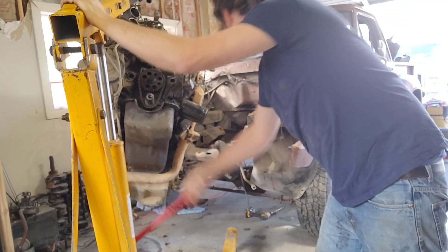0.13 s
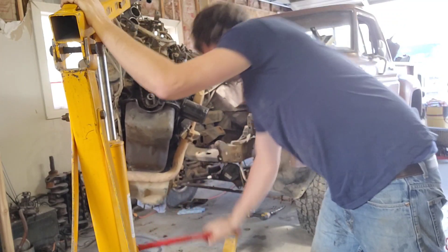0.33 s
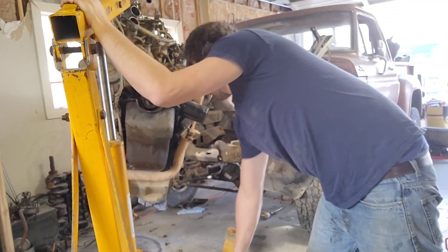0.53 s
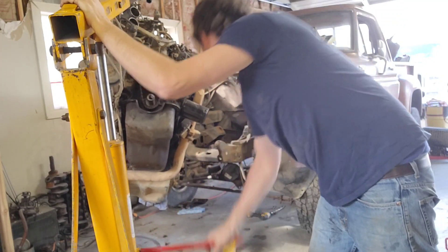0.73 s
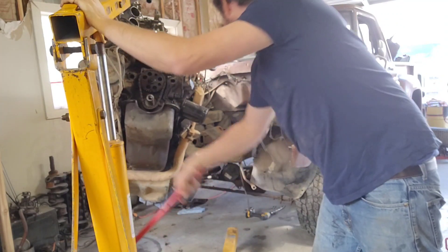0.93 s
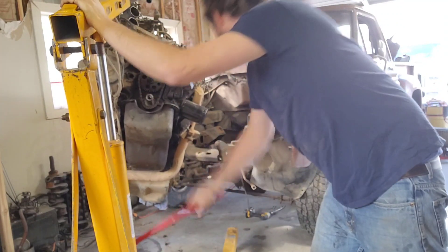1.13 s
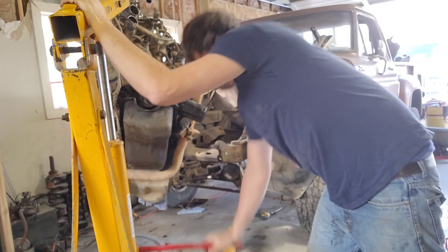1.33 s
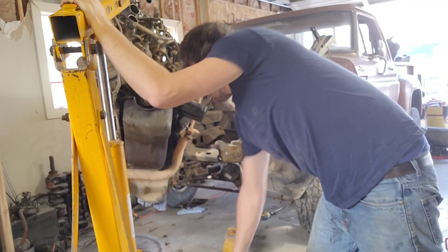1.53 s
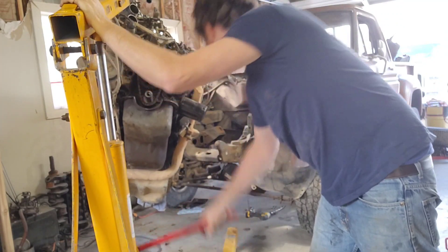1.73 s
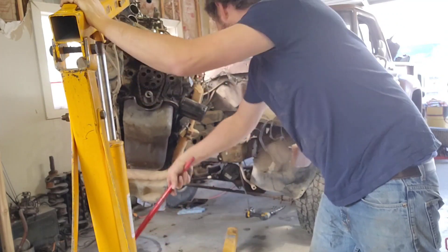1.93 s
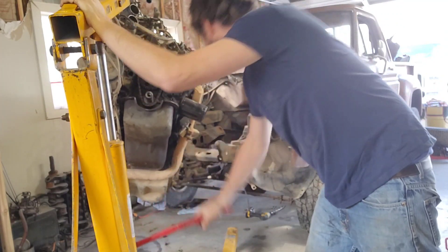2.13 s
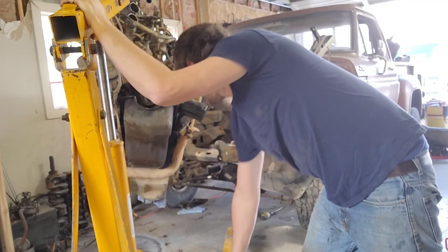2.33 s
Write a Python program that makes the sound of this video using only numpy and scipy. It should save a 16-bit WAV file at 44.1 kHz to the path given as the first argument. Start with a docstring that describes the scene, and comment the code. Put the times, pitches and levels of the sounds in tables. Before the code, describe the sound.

The steel handle of a hydraulic hoist clanks close by on three even pump strokes, the middle one duller. A thin squeak comes first, and the linkage rubs and hisses softly between strokes in a quiet garage.

```python
"""A garage: an engine hoist is pumped by hand, about one stroke a second.
At the top of each stroke the loose steel handle scrapes in its socket and clanks home,
ringing the handle tube and the frame. Between clanks the linkage rubs and oil hisses in the valve.
The dry pivot squeaks once; sliding steel whistles once. Mains hum and room air lie underneath."""
import sys
import numpy as np
from scipy import signal
from scipy.fft import rfft, irfft
from scipy.io import wavfile
from scipy.ndimage import uniform_filter1d

SR = 44100
rng = np.random.default_rng(int(sys.argv[2]) if len(sys.argv) > 2 else 0)


def transcribe(signal):
    """Save signal, clipped to [-1, 1], as a 16-bit WAV file at the path in sys.argv[1]."""
    frames = np.atleast_2d(signal).T
    limited = np.clip(frames, -1, 1)
    pcm = np.round(limited * 32767).astype(np.int16)
    wavfile.write(sys.argv[1], SR, pcm)


N = 110250

# Handle-socket contacts. Each row: peak, rise and decay in seconds, then knock, clang and scrape in dB.
CONTACTS = [(0.204, 0.00062, 0.0031, -53, -62, -48.5), (0.21, 0.0013, 0.0033, -52.5, -53.5, -46),
            (0.2254, 0.0018, 0.0032, -54, -38.5, -52.5), (0.231, 0.0021, 0.0062, -49, -42.5, -54.5),
            (0.244, .001, 0.006, -61, -42.5, -60), (0.251, 0.00068, .005, -55, -47, -62),
            (1.144, .002, 0.038, -63, -69, -62), (1.162, .0006, 0.0082, -51.5, -59.5, -47.5),
            (1.177, 0.0023, 0.0073, -45, -58, -53), (1.198, .002, 0.0038, -50.5, -61.5, -67),
            (2.107, 0.0041, 0.012, -52, -56, -54), (2.1167, .0006, 0.0027, -51, -40.5, -49),
            (2.128, 0.0016, 0.0039, -49.5, -42, -58), (2.146, 0.0013, 0.0047, -48, -44.5, -71)]
# Spectra of frame knock, tube clang and scrape. Each row: frequency in Hz, relative level in dB.
KNOCK_SPECTRUM = [(30, -27), (70, -14), (140, -9.5), (230, -7), (360, -1.5), (500, -1), (600, -3),
                  (760, 0.5), (1050, 4), (1350, -4.5), (1750, 0), (2600, -16.5), (8000, -42)]
CLANG_SPECTRUM = [(200, -28.5), (1150, -20.5), (1450, -3), (1800, 0), (2100, -0.5), (2700, 3.5),
                  (3500, -3.5), (4600, -6), (5600, -11.5), (6400, -8), (7500, -8.5), (8400, -15.5),
                  (10000, -26), (16000, -31.5)]
SCRAPE_SPECTRUM = [(300, -20.5), (1800, -15.5), (3300, -2.5), (4500, 8), (5400, -0.5), (6500, 3.5),
                   (7500, -16.5), (9000, -3), (10000, -9.5), (11400, -1.5), (12600, -12.5), (13700, -8),
                   (16000, -1.5)]
# Modes: frame below 1.3 kHz, tube above. Each row: frequency in Hz, relative level in dB, T60 in seconds.
MODES = [(68, -19, .6), (125, -20, .6), (168, -20, .55), (228, -13, .45), (339, 0, .27), (382, 0, .34),
         (507, -6, .28), (700, -5, .3), (786, -4, .26), (842, -7, .3), (898, -5, .26), (1022, 1, .21),
         (1067, 1, .23), (1207, -7, .24), (1378, -5, .24), (1583, -3, .5), (1677, 3, .41), (1749, 2, .33),
         (1844, -1, .46), (1962, -6, .34), (2291, -1, .33), (2445, -5, .3), (2549, 0, .39), (2650, -3, .31),
         (2686, -4, .34), (2756, -4, .3), (2848, -4, .31), (3336, -7, .27), (3365, -7, .27)]
# Impacts as the handle seats. Each row: start in seconds, level in dB.
STRIKES = [(0.2247, -43.5), (0.2312, -49), (2.1192, -46.5), (2.127, -45)]
# Impact spectrum. Each row: frequency in Hz, relative level in dB.
STRIKE_SPECTRUM = [(500, -16), (1600, -8), (2700, 2), (3600, 0), (5500, -4), (6500, 3.5), (7500, 4.5),
                   (8600, -12.5), (11500, -8), (16000, -22.5)]
# Pump slides. Each row: peak, rise and fall in seconds, then rub, oil hiss and grit in dB.
SLIDES = [(0.055, 0.0094, 0.05, -56, -82, -50), (0.12, 0.018, 0.04, -57.5, -78, -55),
          (0.18, 0.016, .02, -60, -72, -48.5), (0.631, .003, 0.022, -58, -83, -87.5),
          (0.691, 0.02, 0.041, -50, -70, -61), (0.726, 0.013, 0.0094, -51, -42.5, -53),
          (0.81, .02, 0.0177, -72.5, -70, -78), (1.501, 0.02, 0.016, -58, -83, -63.5),
          (1.618, 0.013, 0.067, -52, -70, -62), (1.726, 0.027, 0.013, -43.5, -48.5, -46),
          (1.81, 0.015, 0.028, -54, -80.5, -59)]
# Spectra of rub, oil hiss and grit. Each row: frequency in Hz, relative level in dB.
RUB_SPECTRUM = [(100, -12), (250, -7), (450, -1), (620, -5), (850, 0), (1100, -2), (1700, -5), (2600, -8),
                (4000, -24), (12000, -45)]
HISS_SPECTRUM = [(1000, -21.5), (6000, -14.5), (8700, -3.5), (9700, -8.5), (10800, -1), (11500, -7.5),
                 (12300, -0.5), (13000, -9), (13800, 2), (14500, 0.5), (15500, -7.5)]
GRIT_SPECTRUM = [(500, -9.5), (2000, -6.5), (2550, 0.5), (3100, -11), (3550, 1), (3950, -7.5), (4900, 1),
                 (5300, -4), (5800, -2.5), (6900, -12), (8100, -4.5), (9500, -15), (15000, -20)]
# Dull rubs as the handle lifts. Each row: peak, rise and fall in seconds, level in dB.
SHUFFLES = [(0.01, .01, 0.029, -56), (1.018, 0.0085, .09, -56), (1.595, 0.005, 0.037, -52)]
# Their spectrum. Each row: frequency in Hz, relative level in dB.
SHUFFLE_SPECTRUM = [(150, -16), (280, -10), (380, 5.5), (500, 2.5), (700, -10), (1100, -11.5), (2200, -24),
                    (4000, -43)]
# Pivot squeak contour. Each row: time in seconds, pitch in Hz, level in dB.
SQUEAK_CONTOUR = [(0, 4270, -44), (.012, 4200, -46), (.028, 4320, -47.5), (0.043, 4190, -54),
                  (.056, 4290, -66), (.08, 4200, -63.5), (.09, 4200, -86.5)]
# Garage decay. Each row: frequency in Hz, T60 in seconds.
ROOM_T60 = [(80, .8), (250, 0.59), (700, 0.26), (1800, .41), (4000, 0.37), (7500, 0.36), (11000, .26),
            (16000, 0.14)]
# Stereo balance of the hoist. Each row: frequency in Hz, left minus right in dB.
BALANCE = [(300, -0.5), (1000, -1), (4000, -1.4), (8000, -1), (12000, -5.5)]
# Room air spectrum. Each row: frequency in Hz, relative level in dB.
AIR_SPECTRUM = [(20, -11), (45, 7.5), (80, 6), (160, -2.5), (380, 1.5), (700, -7), (1500, -19.5),
                (3000, -32), (8000, -30), (16000, -28.5)]

COHERENT_BELOW_HZ, TOP_HZ = 380, 15700


def handle_contacts(knock_direct_db=-5, clang_direct_db=-11.5, scrape_direct_db=-3):
    """The handle grinds in its socket: frame knock, tube clang, scrape and the ringing they excite."""
    power = 0
    for peak_s, rise_s, decay_s, *levels_db in CONTACTS:
        pulse = swell(peak_s, rise_s, decay_s) / (rise_s + decay_s)
        power = power + undb(levels_db)[:, None] ** 2 * pulse
    knock_power, clang_power, scrape_power = power
    knock = garage(friction(knock_power, KNOCK_SPECTRUM), knock_direct_db)
    clang = garage(friction(clang_power, CLANG_SPECTRUM), clang_direct_db)
    scrape = garage(friction(scrape_power, SCRAPE_SPECTRUM), scrape_direct_db)
    return knock + clang + scrape + steel_ring(knock_power, clang_power)


def steel_ring(knock_power, clang_power, knock_db=5, clang_db=3.5, build_cycles=5.1, wander_rad=.1):
    """Modes store contact energy and decay. Knocks feed the low modes, clangs the high ones."""
    knock_below_hz, clang_above_hz = 1900, 1400
    t, out = np.arange(N) / SR, 0
    for hz, db, t60_s in MODES:
        knock_feed = knock_power * undb(knock_db) ** 2 / (1 + (hz / knock_below_hz) ** 10)
        clang_feed = clang_power * undb(clang_db) ** 2 / (1 + (clang_above_hz / hz) ** 10)
        build_pole = np.exp(-hz / (build_cycles * SR))
        decay_pole = np.exp(-2 * np.log(1000) / (t60_s * SR))
        feed = signal.lfilter([1 - build_pole], [1, -build_pole], knock_feed + clang_feed + 1e-18)
        energy = signal.lfilter([1 / SR], [1, -decay_pole], feed)
        # High modes arrive out of step left and right.
        spread_rad = min(hz / COHERENT_BELOW_HZ / 2, 1) * rng.choice([-1, 1]) * np.pi / 4
        phase_rad = 2 * np.pi * (hz * t + rng.random()) + wander_rad * drift(30)
        tone = np.sin(phase_rad + np.array([[spread_rad], [-spread_rad]]))
        out = out + undb(db) * np.sqrt(2 * energy) * tone
    return out


def seating_strikes(decay_s=.00056):
    """Steel hits steel as the handle seats: short, bright cracks."""
    power = sum(undb(db) ** 2 * swell(start_s, 1 / SR, decay_s) / decay_s for start_s, db in STRIKES)
    return colour(np.sqrt(power) * rng.choice([-1, 1], N), STRIKE_SPECTRUM)


def pump():
    """The linkage rubs and oil hisses through the valve in soft swells."""
    power = 0
    for peak_s, rise_s, fall_s, *levels_db in SLIDES:
        power = power + (undb(levels_db)[:, None] * swell(peak_s, rise_s, fall_s)) ** 2
    spectra = RUB_SPECTRUM, HISS_SPECTRUM, GRIT_SPECTRUM
    return sum(friction(part, spectrum) for part, spectrum in zip(power, spectra))


def handle_shuffle():
    """Soft, dull rubbing as the handle lifts."""
    gain = sum(undb(db) * swell(peak_s, rise_s, fall_s) for peak_s, rise_s, fall_s, db in SHUFFLES)
    return friction(gain ** 2, SHUFFLE_SPECTRUM)


def pivot_squeak(wobble_ratio=.014, flutter_db=4):
    """Dry steel at the pivot: a thin tone, unsteady in pitch and level."""
    t = np.arange(N) / SR
    times_s, hz, db = np.array(SQUEAK_CONTOUR).T
    pitch_hz = np.interp(t, times_s, hz) * (1 + wobble_ratio * drift(400))
    gain = undb(np.interp(t, times_s, db) + flutter_db * drift(200)) * (t < times_s[-1])
    return gain * np.sin(2 * np.pi * np.cumsum(pitch_hz) / SR)


def steel_whistle(centre_hz=13680, wobble_ratio=.004, level_db=-46):
    """Steel slides on steel in the second stroke: a brief, very high tone."""
    pitch_hz = centre_hz * (1 + wobble_ratio * drift(300))
    gain = undb(level_db) * swell(peak_s=1.163, rise_s=.012, fall_s=.03)
    return gain * np.sin(2 * np.pi * np.cumsum(pitch_hz) / SR)


def friction(power, spectrum, clicks_per_s=4000, scatter_db=5.5):
    """Stick-slip: dense clicks of uneven size under a power envelope, filtered to a spectrum."""
    clicks = (rng.random(N) < clicks_per_s / SR) * rng.choice([-1, 1], N)
    clicks = clicks * undb(scatter_db * rng.standard_normal(N))
    return colour(np.sqrt(power) * clicks / np.std(clicks), spectrum)


def garage(x, direct_db, bands=12, build_s=.001, left_lag_s=.00016):
    """Direct sound plus a diffuse tail that dies sooner in the treble."""
    t, hz = np.arange(SR) / SR, np.fft.rfftfreq(SR, 1 / SR)
    centres_hz = np.geomspace(100, TOP_HZ, bands)
    noise_spectrum, response = rfft(diffuse_noise(SR)), 0
    for centre_hz, weights in zip(centres_hz, np.eye(bands)):
        band = irfft(noise_spectrum * lookup(list(zip(centres_hz, weights)), hz), SR)
        fade = np.exp(-np.log(1000) * t / lookup(ROOM_T60, centre_hz)) * (1 - np.exp(-t / build_s))
        response = response + band * fade / np.linalg.norm(fade)
    response[0, int(left_lag_s * SR)] += undb(direct_db)
    response[1, 0] += undb(direct_db)
    return signal.fftconvolve(x[None], response, axes=1)[:, :N]


def mains_hum(hz=59.7, rms_db=-64.5, waver_db=1.2):
    """A low mains tone, slowly wavering in level."""
    gain = np.sqrt(2) * undb(rms_db + waver_db * drift(2.7))
    return gain * np.sin(2 * np.pi * hz * np.arange(N) / SR)


def room_air(rms_db=-66):
    """Still room air: steady, dark, diffuse noise."""
    return undb(rms_db) * np.array([colour(channel, AIR_SPECTRUM) for channel in diffuse_noise(N)])


def diffuse_noise(n):
    """Noise from all sides: left and right alike in the bass, unrelated in the treble."""
    coherence = 1 / (1 + (np.fft.rfftfreq(n, 1 / SR) / COHERENT_BELOW_HZ) ** 2)
    mid, side = rfft(rng.standard_normal((2, n)))
    mid, side = mid * np.sqrt((1 + coherence) / 2), side * np.sqrt((1 - coherence) / 2)
    return irfft(np.array([mid + side, mid - side]), n)


def colour(x, spectrum, taps=4096):
    """Minimum-phase filter of unit energy with the given spectrum."""
    gain = undb(lookup(spectrum, np.fft.rfftfreq(taps, 1 / SR)))
    cepstrum = irfft(np.log(gain))
    cepstrum[1:taps // 2] *= 2
    cepstrum[taps // 2 + 1:] = 0
    response = irfft(np.exp(rfft(cepstrum)))
    return signal.fftconvolve(x, response / np.linalg.norm(response))[:N]


def swell(peak_s, rise_s, fall_s):
    """Exponential rise to 1, then exponential fall."""
    t = np.arange(N) / SR
    return np.exp(-np.maximum((peak_s - t) / rise_s, (t - peak_s) / fall_s))


def drift(rate_hz):
    """Smooth random curve, standard deviation near 1."""
    hold = max(int(SR / rate_hz), 1)
    steps = np.repeat(rng.standard_normal(N // hold + 1), hold)
    return np.sqrt(2) * uniform_filter1d(uniform_filter1d(steps, hold), hold)[:N]


def lookup(table, hz):
    """Interpolate a table on a log-frequency axis."""
    table_hz, values = np.array(table, float).T
    return np.interp(np.log(np.maximum(hz, 1)), np.log(table_hz), values)


def undb(db):
    """Decibels to gain."""
    return 10 ** (np.asarray(db) / 20)


def scene():
    """The hoist in the garage, its treble a little to the right, over hum and air."""
    hoist = handle_contacts() + garage(seating_strikes(), direct_db=-1.5)
    hoist += garage(pump() + handle_shuffle() + steel_whistle(), direct_db=-10)
    hoist += garage(pivot_squeak(), direct_db=-1)
    balance_db = lookup(BALANCE, np.fft.rfftfreq(2 * N, 1 / SR))
    channel_gains = undb(np.array([balance_db, -balance_db]) / 2)
    panned = irfft(rfft(hoist, 2 * N) * channel_gains)[:, :N]
    return panned + mains_hum() + room_air()


def record(dry):
    """Steep low-pass at TOP_HZ."""
    return signal.sosfilt(signal.ellip(10, .2, 70, TOP_HZ, fs=SR, output="sos"), dry)


dry = scene()
out = record(dry)
transcribe(out)
```